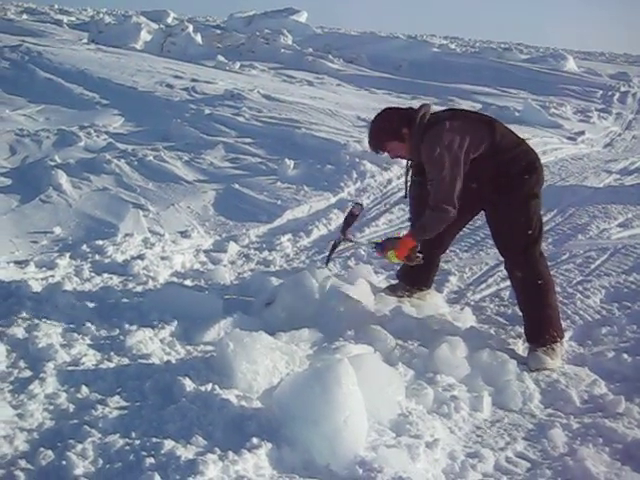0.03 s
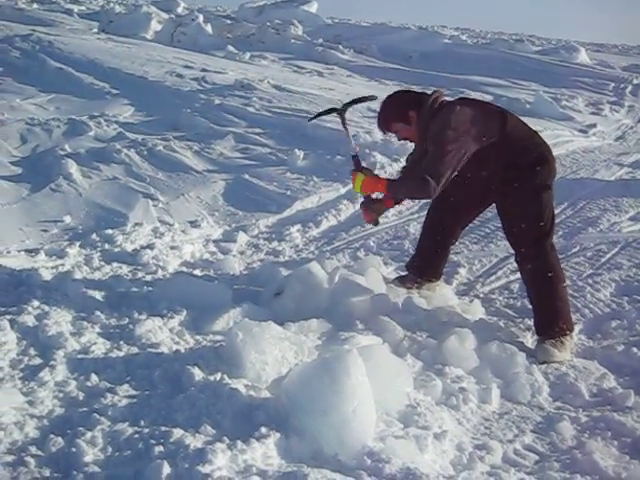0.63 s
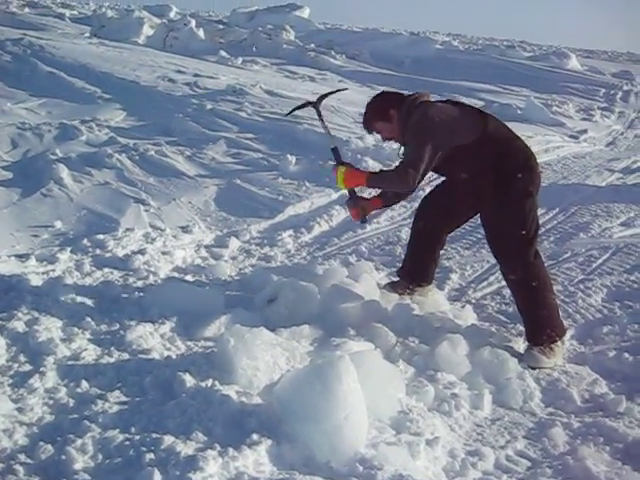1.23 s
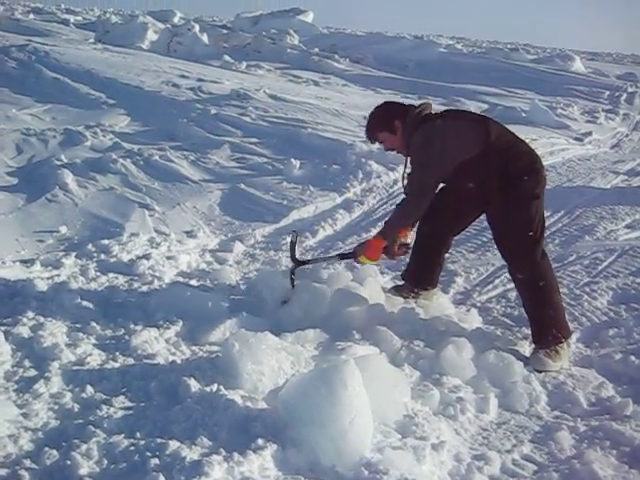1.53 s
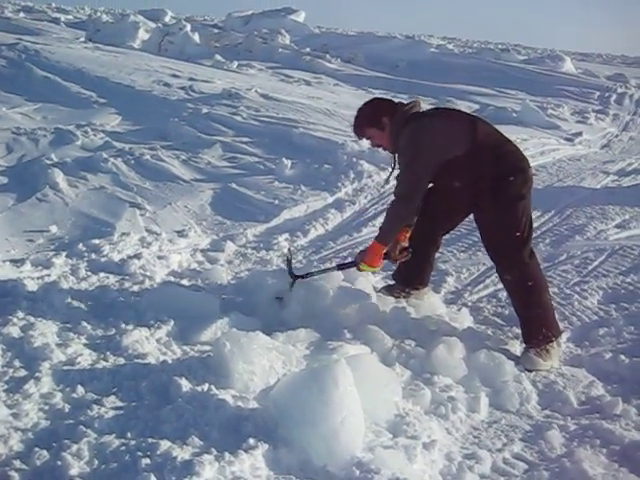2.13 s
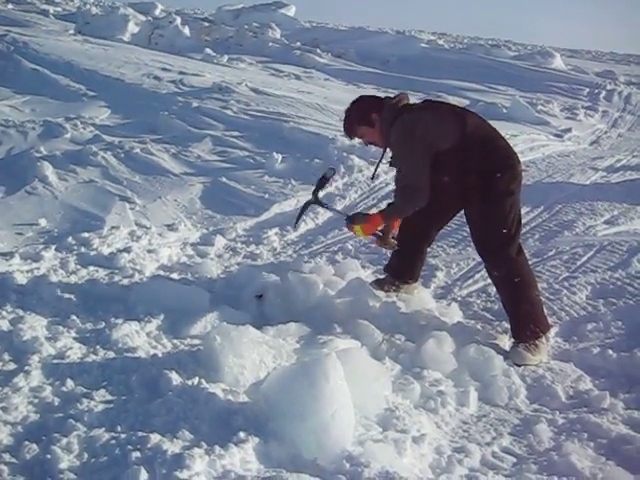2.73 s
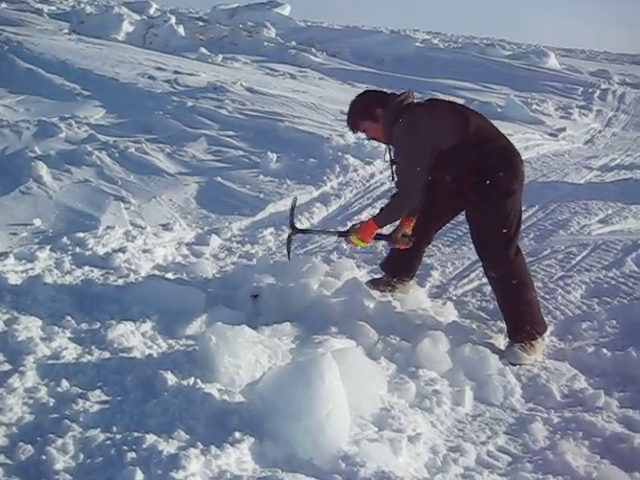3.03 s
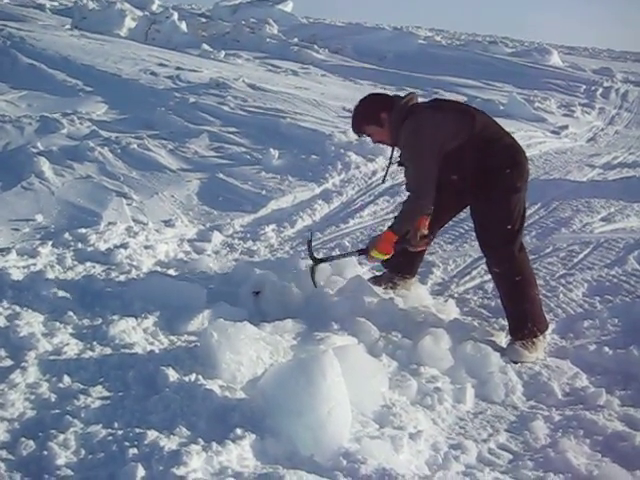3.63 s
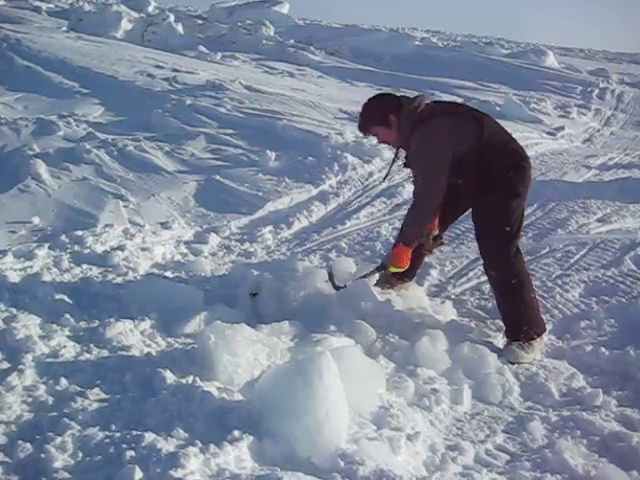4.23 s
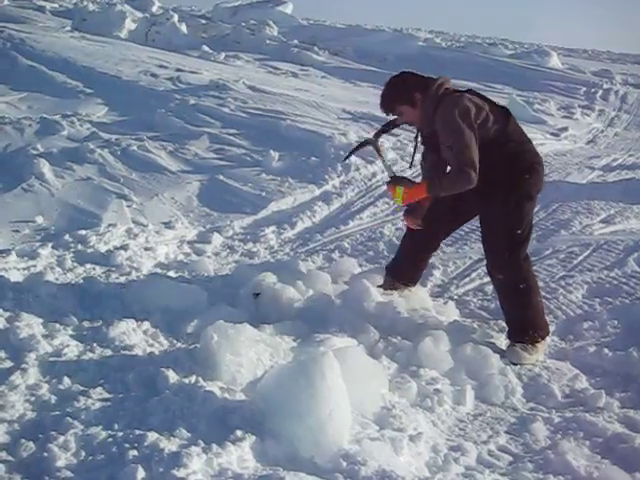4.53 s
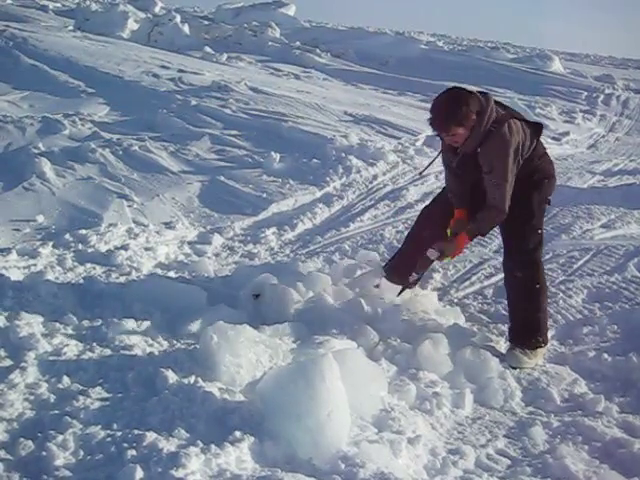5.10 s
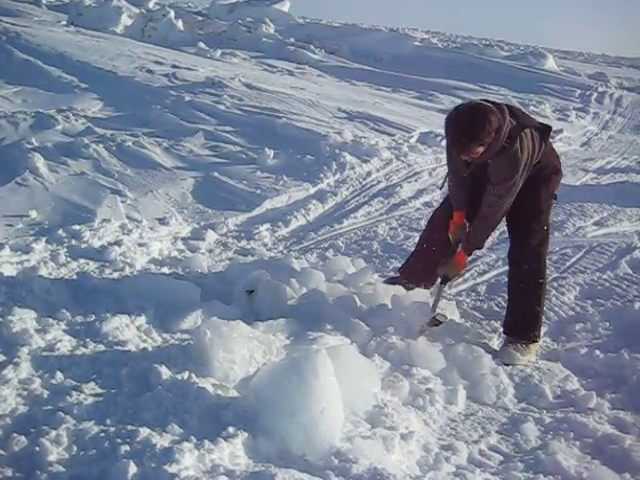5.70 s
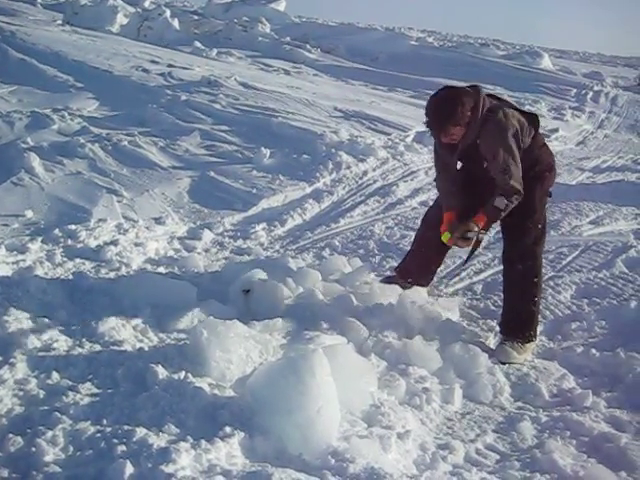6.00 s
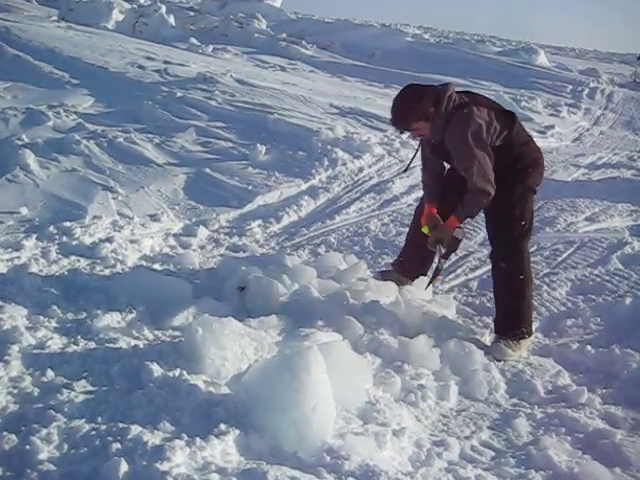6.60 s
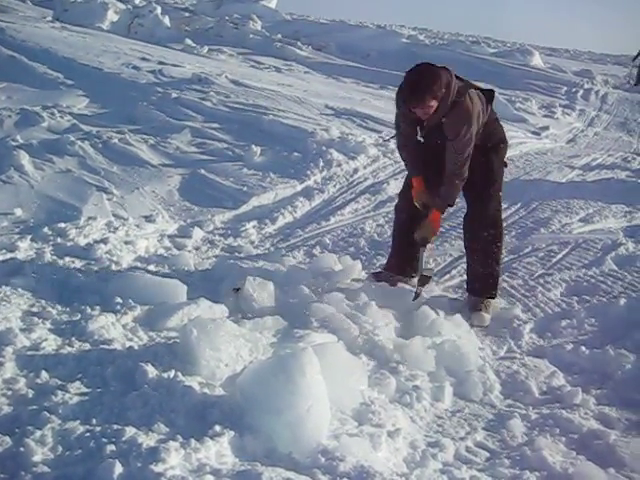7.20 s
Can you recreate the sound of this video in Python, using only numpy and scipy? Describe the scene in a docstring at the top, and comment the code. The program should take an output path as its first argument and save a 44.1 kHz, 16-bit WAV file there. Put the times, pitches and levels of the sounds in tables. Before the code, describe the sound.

Sharp, evenly paced pick blows split ice on an open snowfield while fragments scatter, trickle and tinkle in a light breeze.

```python
"""A pickaxe chops hard ice on an open snowfield, with no walls to echo. First, crumbs of ice shift and
shards clink in a light wind. Then comes the first of eleven short cracks that overload the microphone.
After each one, crumbs spray and trickle. In between, the steel head scrapes through the rubble, snow
crunches under boots, chunks knock, and the steel sings as it comes free. Late on, the strongest gusts
buffet the microphone, and the last two blows follow."""
import sys
import numpy as np
from scipy import signal
from scipy.fft import rfft, irfft
from scipy.io import wavfile

SR = 44100
rng = np.random.default_rng(int(sys.argv[2]) if len(sys.argv) > 2 else 0)


def generate_wav(signal):
    """Clip the signal to [-1, 1] and save it as 16-bit WAV at the path in sys.argv[1]."""
    frames = np.transpose(np.atleast_2d(signal))
    scaled = np.clip(frames, -1, 1) * 32767
    pcm = np.round(scaled).astype(np.int16)
    wavfile.write(sys.argv[1], SR, pcm)


N = 324135

# Blows of the pick. Each row: start in seconds, crack level in dB, splitting time in seconds, pitch of
# the ice in Hz, bass boost in dB, relative crumbling level in dB, ground thud level in dB.
BLOWS = [(0.1082, -5.5, 0.0028, 5230, 8, -15.5, -30), (0.7839, -1, 0.0044, 3780, 1, -18.5, -22),
         (1.4621, -1.5, 0.0028, 3500, 0.5, -29.5, -16), (2.1151, -6, 0.0039, 6300, -7.5, -24, -27),
         (2.8113, -2, 0.0034, 2450, -2, -17, -38), (3.452, -0.5, 0.004, 4620, 0, -17.5, -40),
         (4.1057, -2.5, 0.0038, 2460, -22, -21, -46), (4.819, -4.5, 0.0037, 4730, -3.5, -18.5, -30),
         (5.6087, -3.5, 0.0027, 2730, 3, -17, -29), (6.3221, -3.5, 0.0063, 3670, -28, -19, -25),
         (6.9607, -4, 0.0028, 4100, -5, -25, -20)]
# The tone of moving rubble. Each row: frequency in Hz, relative level in dB.
RUBBLE_SPECTRUM = [(88, -40.5), (150, -4.5), (354, -3.5), (494, -7.5), (837, 0), (1530, -3), (1630, -2),
                   (1790, -2), (2980, -5.5), (3490, -0.5), (6020, 2), (7770, -2), (11500, -1.5),
                   (14200, -11), (16000, -16)]
# The tone of snapping ice. Each row: frequency in Hz, relative level in dB.
SNAP_SPECTRUM = [(50, -22), (150, -26), (400, -5.5), (900, -1.5), (1500, 1.5), (2600, 6), (5000, 3),
                 (6800, 7.5), (8500, 0.5), (11500, 1.5), (16000, -16.5)]


def from_db(db):
    """Turn decibels into a number to multiply by."""
    return 10 ** (np.asarray(db) / 20)


def rms_one(x):
    """Scale a sound to an average power of 1."""
    return x / np.sqrt(np.mean(x ** 2) + 1e-20)


def burst(x):
    """Scale a short sound to the energy of 10 milliseconds at power 1."""
    return x * np.sqrt(.01 * SR / (np.sum(x ** 2) + 1e-20))


def add(out, s, x):
    """Mix the short sound x into out, starting at s seconds."""
    i = max(round(s * SR), 0)
    out[i:i + len(x)] += x[:max(N - i, 0)]


def fade(t60, size=4096):
    """A curve that dies away from 1. The fade time t60 is the seconds it takes to drop 60 dB."""
    return from_db(-60 * np.arange(size) / (max(t60, 1e-4) * SR))


def drift(rate_hz):
    """A smooth random wobble, about 1 in size."""
    step = 40   # samples between points
    r = np.exp(-2 * np.pi * step * rate_hz / SR)
    slow = signal.lfilter([1], [1, -2 * r, r * r], rng.standard_normal(N // step + 2002))[2000:]
    return np.interp(np.arange(N) / step, np.arange(len(slow)), rms_one(slow))


def band(x, hz, kind, order=2):
    """Keep the lows, the highs or a band in between."""
    return signal.sosfilt(signal.butter(order, np.clip(hz, 10, .45 * SR), kind, fs=SR, output="sos"), x)


def ring(x, hz, t60):
    """Every click in x sets off a fading tone."""
    r, w = from_db(-60 / (t60 * SR)), 2 * np.pi * hz / SR
    return signal.lfilter([0, np.sin(w)], [1, -2 * r * np.cos(w), r * r], x + 1e-18)


def colour(x, spectrum, size=1024):
    """Give a sound the tone of a spectrum table; white noise keeps its power."""
    hz, db = np.transpose(spectrum)
    grid_hz = np.arange(size // 2 + 1) * SR / size
    gains = from_db(np.interp(np.log(grid_hz + 1), np.log(hz), db))
    # build the filter so that nothing sounds ahead of a click (minimum phase)
    cepstrum = irfft(np.log(gains))
    cepstrum[1:size // 2] *= 2
    cepstrum[size // 2 + 1:] = 0
    pulse = irfft(np.exp(rfft(cepstrum)))
    return signal.fftconvolve(x, pulse / np.linalg.norm(pulse))[:len(x)]


def grains(per_s, spread_db, size=N):
    """Tiny clicks at random times, many weak and a few strong."""
    heights = from_db(spread_db * np.minimum(rng.exponential(1, size), 4))
    return rms_one(heights * rng.choice([-1, 1], size) * (rng.random(size) < per_s / SR))


def bumps(rows, cycles, rise_s):
    """Low swings of air pressure that die within a few cycles."""
    out, t = np.zeros(N), np.arange(8192) / SR
    rise = 1 - np.exp(-t / rise_s)
    for s, db, hz in rows:
        add(out, s, from_db(db) * np.sin(2 * np.pi * hz * t) * fade(cycles / hz, size=len(t)) * rise)
    return band(out, 680, "low")


def stroke(s, length_s, db, sag_db_per_s, attack_s=0.032, release_db_per_s=242):
    """The strength of one push through rubble: it takes hold, sags as the load runs off, then rests."""
    t = np.arange(N) / SR - s
    lost_db = sag_db_per_s * np.clip(t, 0, length_s) + release_db_per_s * np.clip(t - length_s, 0, 1)
    return np.clip(t / attack_s, 0, 1) * from_db(db - lost_db)


def stirring(trickle_db=-45, spill_db=-7.0, settle_t60=0.5):
    """How strongly snow, crumbs and spray move: they trickle, get raked aside and spill from each blow."""
    # Rubble raked aside. Each row: start in seconds, length in seconds, level in dB, sag in dB per
    # second, then snow and fine spray in dB relative to the crumbs.
    rakes = [(-0.02, 0.087, -27.5, 5, -10, -5.5), (0.185, 0.073, -25.5, 5, -18, -8.5),
             (0.273, 0.071, -23.5, 5, -16, -4), (0.402, 0.084, -28.5, 5, -20, -4),
             (0.54, 0.16, -33, 5, -5.5, -10.5), (0.708, 0.37, -25, 13, -7, -7),
             (1.094, .2, -20, 69, -10.5, -6), (1.509, 0.21, -25.5, 30, -8.5, -5.5),
             (1.722, 0.27, -34, 14, -7, 0.5), (2.02, 0.09, -41, 5, -2, -1), (2.2, 0.45, -30, 4, -8.5, -4.5),
             (2.92, 0.31, -30, 0, -9, -4), (3.261, 0.13, -29, 38, -12, -5), (3.41, .04, -28.5, 5, -15, -6),
             (3.566, 0.23, -22.5, 46, -6.5, -4.5), (4.012, 0.075, -39.5, 7, -2.5, -2),
             (4.189, 0.54, -22.5, 37.5, -9.5, -8), (4.829, 0.46, -25.5, 3, -11, -7.5),
             (5.289, 0.2, -27, 2, -12.5, -4), (5.502, 0.11, -34.5, 27, -3, -5),
             (5.62, 0.34, -24.5, 6, -13, -6), (5.998, 0.19, -35, 3, -6.5, -2),
             (6.227, 0.16, -30.5, 9, -7.5, -6), (6.447, 0.22, -24, 22, -8.5, -7.5),
             (6.702, 0.15, -34.5, 7, -7, -3), (6.816, 0.25, -21.5, 30, -11.5, -8),
             (7.059, 0.42, -22, 29, -10.5, -6.5)]
    # each list of three levels is in the order snow, crumbs, spray
    power = np.outer(from_db([-1.5, 0, -1]), np.full(N, from_db(trickle_db))) ** 2
    for s, length_s, db, sag, snow_db, spray_db in rakes:
        power += np.outer(from_db([snow_db, 0, spray_db]), stroke(s, length_s, db, sag)) ** 2
    thrown = np.zeros(N)
    for s, *_, crumbling_db, _ in BLOWS:
        add(thrown, s, from_db(crumbling_db + spill_db) * fade(settle_t60, size=SR))
    power += np.outer(from_db([-8.5, 0, -9.5]), thrown) ** 2
    return np.sqrt(power)


def crunching(low_hz, high_hz, per_s, spread_db, clump_db):
    """Grains of similar size tumble in little avalanches."""
    tumbling = grains(per_s, spread_db) * from_db(clump_db * drift(rate_hz=37.4))
    return rms_one(band(colour(tumbling, RUBBLE_SPECTRUM), [low_hz, high_hz], "band", order=3))


def tinkling(low_hz, high_hz, per_s, spread_db, ring_cycles):
    """Pieces of many sizes bounce at random, each with a brief ring of its own."""
    out, t = np.zeros(N), np.arange(1536) / SR
    for when, smallness, force in rng.random((int(per_s * N / SR), 3)):
        hz = low_hz * (high_hz / low_hz) ** smallness
        db = spread_db * min(-np.log(1 - force), 4)
        tone = np.sin(2 * np.pi * hz * t) * fade(ring_cycles / hz, size=len(t))
        add(out, when * N / SR, from_db(db) * np.sqrt(hz) * tone)
    return rms_one(colour(out, RUBBLE_SPECTRUM))


def rubble(snow_gain, crumb_gain, spray_gain):
    """Snow shifts, crumbs roll and fine spray patters down; some pieces of each kind ring."""
    snow = from_db(0.5) * crunching(180, 2690, per_s=1600, spread_db=3.5, clump_db=3.5)
    snow += from_db(-7) * tinkling(382, 2206, per_s=160, spread_db=2.0, ring_cycles=25)
    crumbs = from_db(-3.5) * crunching(1760, 6060, per_s=2600, spread_db=3.5, clump_db=3.0)
    crumbs += from_db(-5.5) * tinkling(2391, 7845, per_s=220, spread_db=4.5, ring_cycles=170)
    spray = from_db(-0.5) * crunching(6850, 22000, per_s=7000, spread_db=5.0, clump_db=2.5)
    spray += from_db(-5) * tinkling(7600, 13730, per_s=130, spread_db=0.0, ring_cycles=220)
    return snow_gain * snow + crumb_gain * crumbs + spray_gain * spray


def wind(breeze_db=-67, flutter_db=2.5):
    """Swirling air rumbles on the microphone: a light breeze, a few gusts and some sudden puffs."""
    # Gusts that swell and die away. Each row: peak time in seconds, half length in seconds, level in dB.
    gusts = [(0.6, 0.31, -55.5), (4.75, 0.21, -63), (5.43, 0.14, -47), (5.99, 0.13, -37)]
    # Puffs on the microphone. Each row: start in seconds, relative level in dB, pitch in Hz.
    puffs = [(5.371, -21.5, 103.7), (5.533, -23.5, 116.4), (5.924, -15.5, 122), (5.991, -14.5, 108),
             (6.028, -11, 146)]
    t = np.arange(N) / SR
    swells = sum(from_db(db) * np.exp(-((t - s) / half_s) ** 2) for s, half_s, db in gusts)
    swirls = band(band(rng.standard_normal(N), 170, "low"), 34, "high")
    swirls = rms_one(swirls * from_db(flutter_db * drift(rate_hz=5.1)))
    buffets = from_db(3.5) * bumps(puffs, cycles=2.15, rise_s=0.0012)
    return (from_db(breeze_db) + swells) * swirls + buffets


def skitters(bounces_per_s=70, ring_cycles=105, slowing_db=3.0, tick_db=-8.0, detune=0.022, uneven_db=3.5):
    """A loose shard bounces many times; its pitch shifts a little with the way it lands."""
    # Shards skipping over the crust. Each row: start in seconds, length in seconds, pitch in Hz,
    # relative level in dB.
    runs = [(0, 0.057, 8550, -30.5), (0.29, 0.19, 5900, -34.5), (0.439, 0.19, 2540, -39.5),
            (0.916, 0.1, 3620, -34.5), (1.721, 0.3, 5240, -40.5), (2.673, 0.061, 7900, -36.5),
            (2.82, 0.074, 6600, -33), (3.209, 0.095, 6800, -34.5), (3.649, 0.11, 5400, -33),
            (3.785, 0.24, 7150, -44.5), (3.85, .1, 8440, -43.5), (4.899, 0.53, 6900, -41),
            (5.481, 0.073, 1947, -36), (5.461, 0.14, 2640, -36.5), (6.088, 0.1, 2710, -37.5),
            (6.102, 0.21, 5140, -39), (6.864, 0.074, 3520, -33), (7.173, 0.11, 6730, -33.5)]
    clinks, ticks, t = np.zeros(N), np.zeros(N), np.arange(2048) / SR
    for s, length_s, hz, db in runs:
        count = 1 + int(length_s * bounces_per_s)
        each_db = db + 10 * np.log10((length_s + .03) / .01 / count)   # the bounces share the energy
        decay, contact = fade(ring_cycles / hz, size=len(t)), fade(0.0051, size=256)
        for k, (late, force, shift) in enumerate(rng.standard_normal((count, 3))):
            progress = np.clip((k + .45 * late) / count, 0, 1) * (k > 0)
            lands_s = s + progress * length_s
            gain = from_db(each_db + uneven_db * force - slowing_db * (progress - .5))
            tone = np.sin(2 * np.pi * hz * (1 + detune * shift) * t)
            add(clinks, lands_s, gain * burst(tone * decay))
            add(ticks, lands_s, gain * burst(rng.standard_normal(len(contact)) * contact))
    return clinks + from_db(tick_db) * colour(ticks, SNAP_SPECTRUM)


def shards(rows, ring_cycles=140, rise_s=0.00082, treble_hz=5200):
    """A shard snaps with a short crunch and rings at a pitch set by its size."""
    out, t = np.zeros(N), np.arange(4096) / SR
    rise = 1 - np.exp(-t / rise_s)
    for s, db, hz, ring_share, t60, treble_db in rows:
        touches = grains(per_s=6000, spread_db=4.2, size=len(t)) * fade(t60 * 0.91) * rise
        crunch = colour(touches, SNAP_SPECTRUM)
        crunch += (from_db(treble_db) - 1) * band(crunch, treble_hz, "high", order=1)
        clink = ring(touches * fade(t60 * 0.42), hz, ring_cycles / hz)
        snap = np.sqrt(1 - ring_share) * burst(crunch) + np.sqrt(ring_share) * burst(clink)
        add(out, s, from_db(db) * snap)
    return out


def small_shards(crumb_gain, per_s=10, level_db=-27.0, pitch_hz=6400, spread_octaves=0.301):
    """Little shards break loose all along, louder where more rubble moves."""
    count, rows = int(per_s * N / SR), []
    stirred_db = 20 * np.log10(rms_one(crumb_gain))
    chances = np.c_[rng.random((count, 2)), rng.standard_normal((count, 4))]
    for k, (when, ringing, force, smallness, length, brightness) in enumerate(chances):
        i = int((k + when) * N / count)
        db = level_db + 0.66 * stirred_db[i] + 2 * force
        hz = pitch_hz * 2 ** (spread_octaves * np.clip(smallness, -2, 2))
        t60 = 0.012 * 2 ** (length / 2)
        treble_db = 4.5 + 5 * brightness
        rows.append((i / SR, db, hz, 0.9 * ringing, t60, treble_db))
    return shards(rows)


def big_shards():
    """The biggest shards clink as they snap off or land."""
    # Each row: start in seconds, level in dB, pitch in Hz, share of ringing from 0 to 1,
    # rough fade time of the crunch in seconds, treble boost in dB.
    pieces = [(0.0528, -16, 5750, 0.7, .016, 0), (0.1671, -21, 3490, .7, 0.047, 6),
              (0.243, -13.5, 7960, 0.5, 0.0077, 21), (0.5293, -20.5, 10300, 0.15, 0.041, 15),
              (0.763, -21, 5160, .3, 0.026, 13), (0.8915, -23, 5840, 0.44, .016, -1),
              (1.0342, -21, 5290, 0.17, 0.038, 17), (1.1199, -16, 5800, 0.15, 0.062, -4),
              (1.2584, -23, 4600, 0, 0.04, 0), (1.535, -23.5, 4710, 1, .034, -1),
              (1.7806, -18, 5160, 0.76, 0.016, 19), (2.069, -35, 7440, .4, .011, 7),
              (2.2585, -22.5, 5420, 0.5, 0.024, -7), (2.3178, -20.5, 5800, .2, .05, 0),
              (2.3854, -21, 6100, 0.7, 0.019, -1), (2.4309, -21, 4750, .6, .033, 11),
              (2.461, -23, 4810, 0.65, 0.043, 10), (2.7676, -28.5, 7440, 0.4, 0.054, 10),
              (2.8362, -14, 7100, 0.6, 0.059, 5), (2.868, -22, 6930, 0.35, 0.027, -18),
              (2.937, -21.5, 5870, 0.63, 0.029, -17), (3.004, -19, 5580, 0.74, 0.024, 9),
              (3.2103, -15.5, 6480, 0.83, 0.014, 13), (3.479, -9, 6900, 0.03, 0.062, -8),
              (3.6594, -15.5, 5300, 0.04, 0.02, 2), (3.7834, -22.5, 6970, .95, .028, -8),
              (3.822, -19.5, 7060, 0.4, 0.064, 0), (3.925, -22.5, 8360, 0.74, 0.041, 19),
              (3.9463, -29, 3970, 0.86, 0.032, 5), (4.1427, -22, 4200, .7, .028, -11),
              (4.8426, -15, 2500, 0.03, .06, -6), (4.9105, -20, 6800, 0.2, 0.02, -4),
              (5.031, -12.5, 5140, 0.36, 0.04, 2), (5.0778, -19, 6900, 0.4, 0.018, 4),
              (5.2069, -19.5, 6900, 0.7, 0.016, 0), (5.273, -24.5, 7000, .9, .018, 3),
              (5.38, -18.5, 9600, 0.48, 0.036, -9), (5.6424, -14.5, 4800, .1, 0.018, -8),
              (5.6708, -22, 4600, 0.65, 0.02, -10), (5.8613, -12.5, 2860, 0.26, 0.022, -7),
              (5.891, -23, 2550, 0.9, 0.027, 3), (5.972, -22, 2490, .9, 0.0093, 14),
              (6.2765, -25.5, 5180, 0.9, 0.029, 4), (7.117, -21, 8330, 0.26, 0.025, -11),
              (7.2846, -16.5, 2910, .6, 0.02, -7)]
    return shards(pieces)


def lulls(depth_db=-1.0, length_s=0.022):
    """A small dip in level: the rubble lies stillest just before the point lands."""
    db, settling = np.zeros(N), np.linspace(0, depth_db, round(length_s * SR))
    for s, *_ in BLOWS:
        add(db, s - len(settling) / SR, settling)
    return from_db(db)


def blows(ring_db=-4.0, ring_t60=0.0079, crack_t60=0.025, crumble_t60=0.09, bass_hz=1100):
    """The point splits the ice in a rush of tiny breaks; then the edges of the hole crumble."""
    # The tone of splitting ice. Each row: frequency in Hz, relative level in dB.
    crack_spectrum = [(60, -33), (300, -10.5), (900, -3), (1500, -5.5), (2400, 0), (4500, 1.5),
                      (6500, -2.5), (8500, -11), (12000, -12), (16000, -74)]
    out = np.zeros(N)
    for s, db, split_s, hz, bass_db, crumbling_db, _ in BLOWS:
        breaks = grains(per_s=25000, spread_db=0.72, size=4096)
        crack = rms_one(colour(breaks, crack_spectrum))
        crack += from_db(ring_db) * rms_one(ring(breaks, hz, ring_t60))
        crack += (from_db(bass_db) - 1) * band(crack, bass_hz, "low", order=1)
        # full force while the point sinks in, then a fast fade
        force = np.minimum(1, fade(crack_t60) * from_db(60 * split_s / crack_t60))
        crumbs = grains(per_s=6200, spread_db=1.7, size=4096)
        crumble = rms_one(colour(crumbs, crack_spectrum)) * fade(crumble_t60)
        add(out, s, from_db(db) * crack * force + from_db(crumbling_db + 11) * crumble)
    return out


def ground_thuds(ground_hz=104):
    """The frozen ground thuds under each blow and under falling lumps and boots."""
    # Lumps and boots landing. Each row: start in seconds, level in dB, pitch in Hz.
    drops = [(.505, -31, 118.6), (.89, -30, 110), (1.622, -13.5, 177), (2.255, -29, 150), (2.96, -33, 90),
             (3.675, -25, 172.5)]
    strikes = [(s, thud_db, ground_hz) for s, *_, thud_db in BLOWS]
    return bumps(drops + strikes, cycles=3.2, rise_s=0.0015)


def pick_head(scrape_db=-2.0, sing_hz=1658, rise_s=0.0046):
    """Ice grinding along the steel stirs all its tones; once the head is free, one tone rings on alone."""
    # Steel dragged through ice. Each row: start in seconds, length in seconds, relative level in dB,
    # sag in dB per second.
    drags = [(0.295, 0.034, -32, 20), (0.773, 0.52, -37, 10), (2.177, 0.5, -35.5, 4.5),
             (6.869, 0.2, -24.5, 90), (7.098, 0.37, -34, 11)]
    # The tones of the steel. Each row: pitch in Hz, relative level in dB, fade time in seconds.
    steel_tones = [(1606, -23, 0.33), (2550, -41, 0.055), (3540, -3, 0.035), (3720, -28, 0.036),
                   (3720, -16, 0.18), (4810, 4.5, 0.032), (5980, -3, 0.064), (6250, -39, .03),
                   (7260, -3, 0.052)]
    # The head comes free. Each row: start in seconds, level in dB, fade time in seconds.
    releases = [(.92, -32, .95), (1.585, -34.5, .9), (2.13, -44, .4), (2.96, -44, .8), (3.59, -37, .9),
                (4.28, -29.5, 1.15), (6.47, -42, 1.0)]
    pressure = sum(stroke(*row) for row in drags)
    grinding = grains(per_s=1500, spread_db=7.5)
    scrape = sum(from_db(db) * rms_one(ring(grinding, hz, t60)) for hz, db, t60 in steel_tones)
    song, t = np.zeros(N), np.arange(SR) / SR
    tone = (1 - np.exp(-t / rise_s)) * np.sin(2 * np.pi * sing_hz * t)
    for s, db, t60 in releases:
        add(song, s, from_db(db) * tone * fade(t60, size=SR))
    return from_db(scrape_db) * pressure * scrape + song


def scuffs(band_ratio=1.53):
    """Packed snow gives way under weight with a soft, low crunch."""
    # Boots and lumps pressing snow. Each row: middle in seconds, a quarter of the length in seconds,
    # level in dB, pitch in Hz.
    presses = [(0.353, 0.023, -39, 300), (0.73, 0.053, -35, 427), (1.106, 0.02, -33, 430),
               (2.247, 0.048, -42.5, 340), (3.033, .02, -36.5, 373), (3.375, .03, -41.5, 323),
               (5.419, 0.034, -41.5, 271), (6.738, 0.067, -37.5, 315)]
    out = np.zeros(N)
    for s, quarter_s, db, hz in presses:
        weight = np.hanning(int(4 * quarter_s * SR))
        snow = grains(per_s=1200, spread_db=2.9, size=len(weight))
        creak = rms_one(band(snow, [hz / band_ratio, hz * band_ratio], "band"))
        add(out, s - 2 * quarter_s, from_db(db) * weight * creak)
    return out


def chunks(ring_cycles=8.2, grit_t60=0.04, rub_db=-13.0, top_hz=2600):
    """Big lumps knock together with a dull, short ring and shed some grit."""
    # Lumps colliding. Each row: start in seconds, level in dB, pitch in Hz, grit in dB relative to
    # the knock.
    knocks = [(0.557, -23.5, 2320, 20), (1.1781, -20, 2060, 2), (1.9012, -28, 880, 4),
              (2.0319, -27.5, 1840, 3), (2.039, -31, 1530, -3), (3.073, -20.5, 2110, 7),
              (3.2261, -12.5, 2270, -13), (4.2256, -24.5, 1030, -1), (4.247, -17, 1180, -8),
              (5.2522, -16, 1700, -5.5), (5.8415, -21, 1010, 2.5), (6.3727, -14.5, 2050, -5.5),
              (7.011, -20.5, 1260, -3)]
    out = np.zeros(N)
    for s, db, hz, grit_db in knocks:
        knock = ring(signal.unit_impulse(4096), hz, ring_cycles / hz)
        knock = band(knock, [hz / 3, top_hz], "band", order=1)
        grit = grains(per_s=5000, spread_db=1.8, size=4096) * fade(grit_t60)
        rub = burst(ring(grit, hz, ring_cycles / hz))
        body = burst(burst(knock) + from_db(rub_db) * rub)
        crunch = burst(colour(grit, SNAP_SPECTRUM))
        add(out, s, from_db(db) * burst(body + from_db(grit_db) * crunch))
    return out


def scene():
    """Pick, ice, snow and wind in the open air, mixed to one channel."""
    snow_gain, crumb_gain, spray_gain = stirring()
    debris = (rubble(snow_gain, crumb_gain, spray_gain) + small_shards(crumb_gain)) * lulls()
    ice = debris + blows() + big_shards() + skitters() + chunks()
    return (ice + ground_thuds() + wind() + scuffs() + pick_head())[None]


def gain_control(x, threshold_db=-2.0, release_db_per_s=220, attack_s=0.002):
    """The volume turns itself down a moment too late after a loud crack, then recovers."""
    recovery_db = release_db_per_s * np.arange(N) / SR
    excess_db = np.maximum(20 * np.log10(np.abs(x) + 1e-9) - threshold_db, 0)
    held_db = np.maximum.accumulate(excess_db + recovery_db, axis=-1) - recovery_db
    lag = np.exp(-1 / (attack_s * SR))
    return x * from_db(-signal.lfilter([1 - lag], [1, -lag], held_db))


def record(dry):
    """The deepest bass is lost, overload flattens the cracks, and the highest treble is cut."""
    bass_hz, ceiling, treble_hz = 36, .63, 15800
    x = gain_control(band(dry, bass_hz, "high"))
    flattened = x / (1 + (x / ceiling) ** 6) ** (1 / 6)
    treble_cut = signal.firwin(161, treble_hz, window=("kaiser", 8), fs=SR)
    return signal.fftconvolve(flattened, treble_cut[None], "same")


dry = scene()
out = record(dry)
generate_wav(out)
```